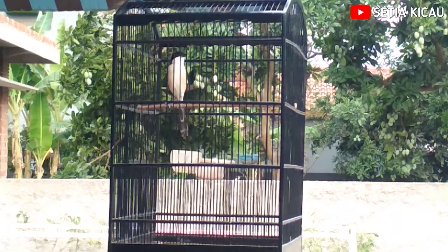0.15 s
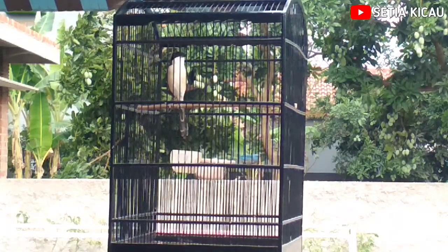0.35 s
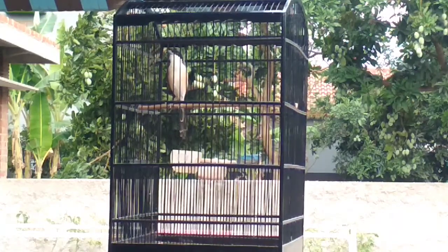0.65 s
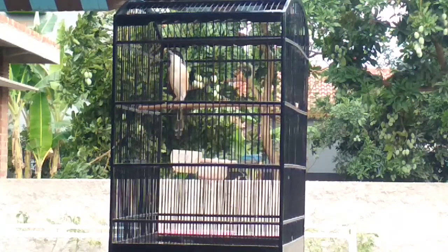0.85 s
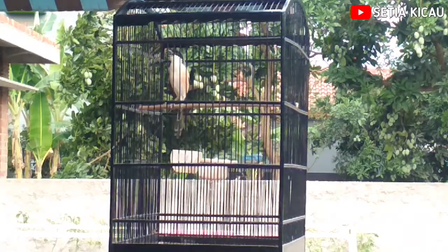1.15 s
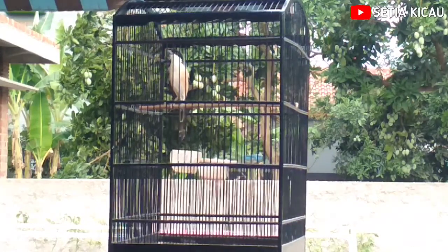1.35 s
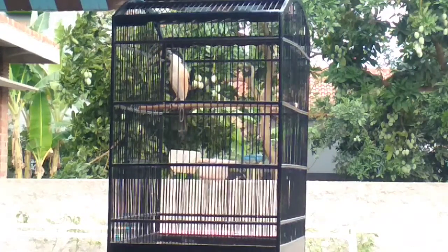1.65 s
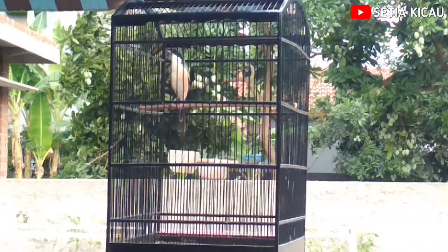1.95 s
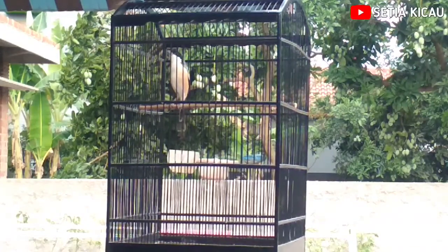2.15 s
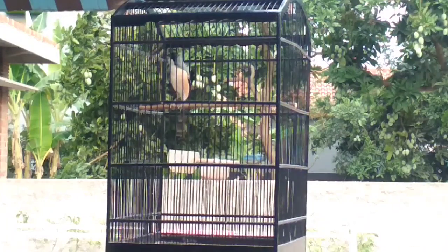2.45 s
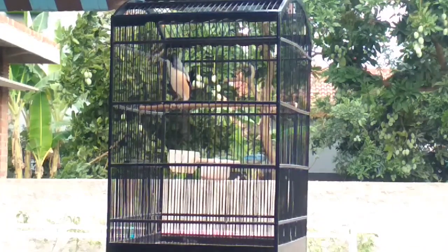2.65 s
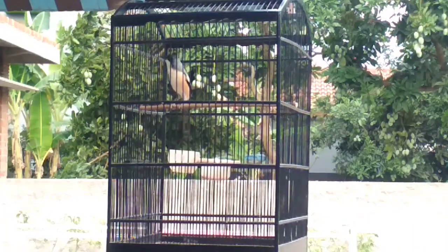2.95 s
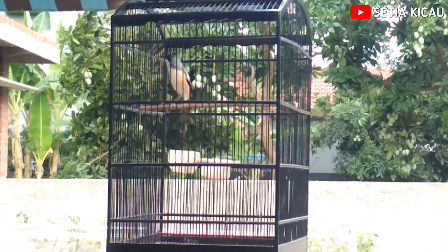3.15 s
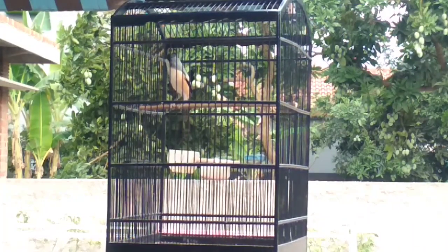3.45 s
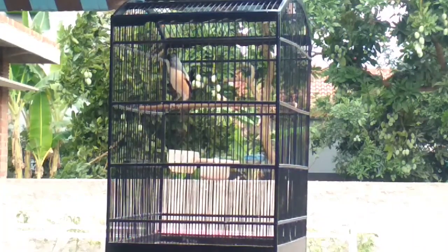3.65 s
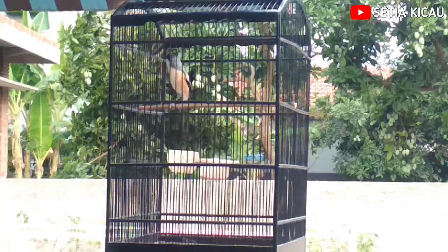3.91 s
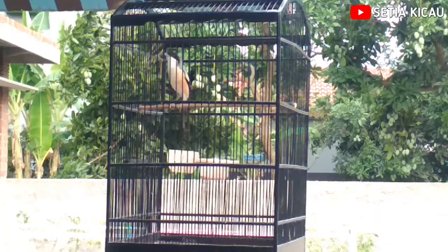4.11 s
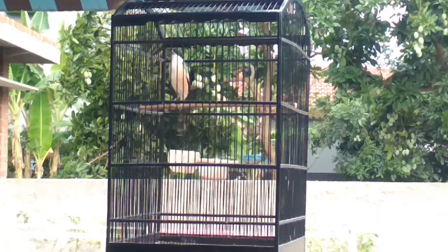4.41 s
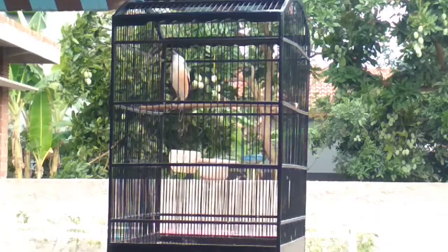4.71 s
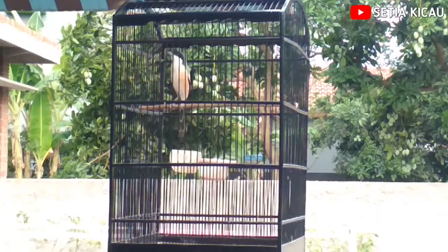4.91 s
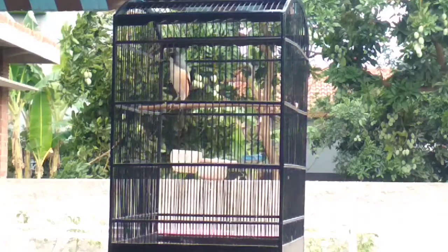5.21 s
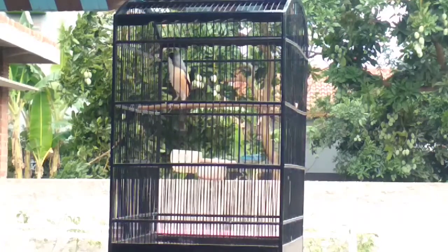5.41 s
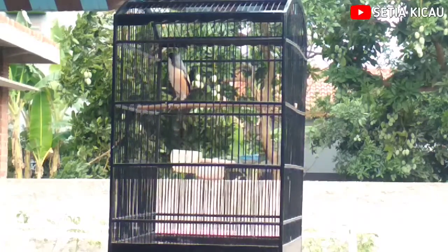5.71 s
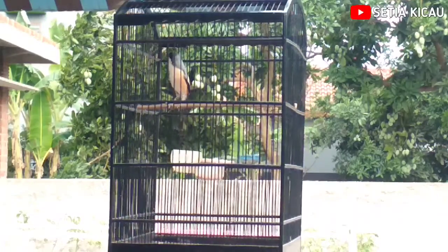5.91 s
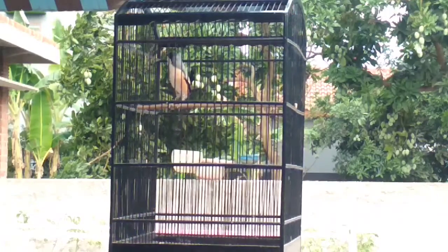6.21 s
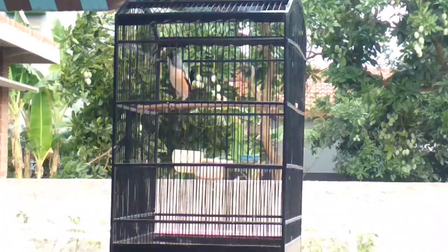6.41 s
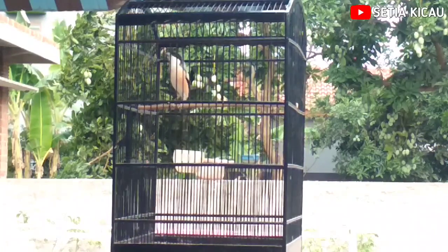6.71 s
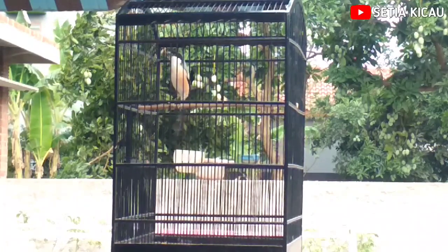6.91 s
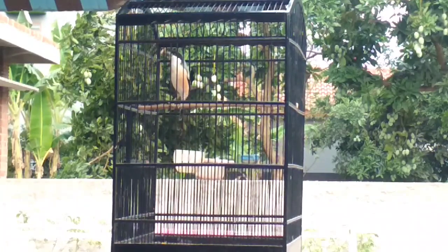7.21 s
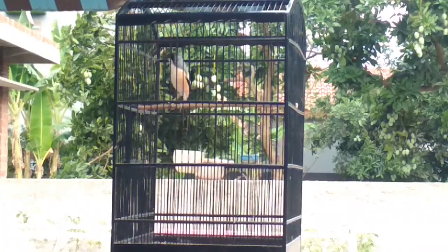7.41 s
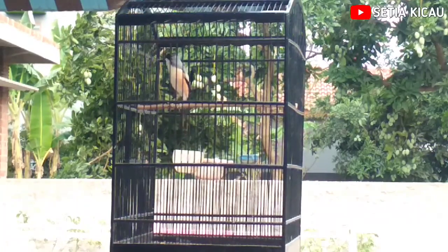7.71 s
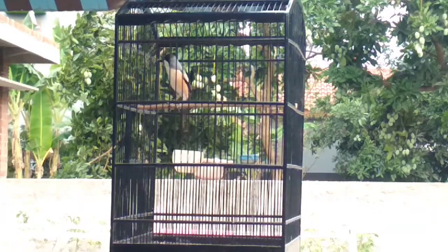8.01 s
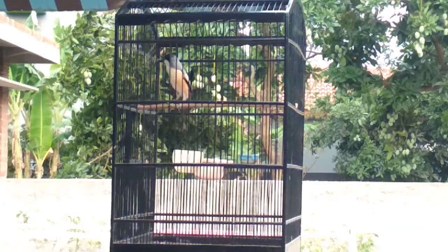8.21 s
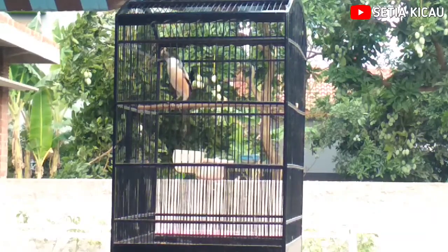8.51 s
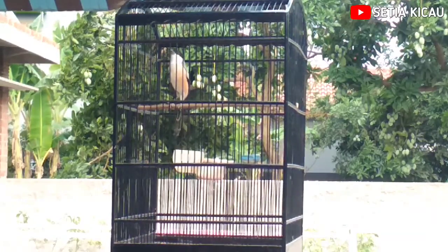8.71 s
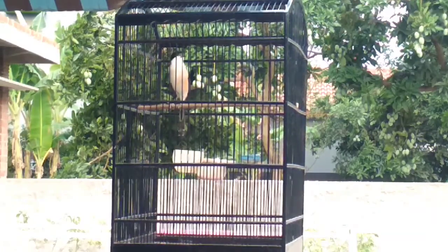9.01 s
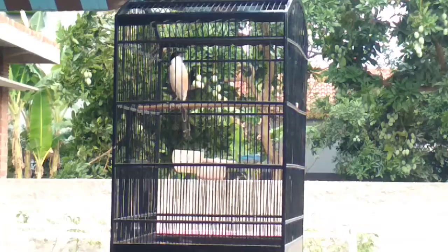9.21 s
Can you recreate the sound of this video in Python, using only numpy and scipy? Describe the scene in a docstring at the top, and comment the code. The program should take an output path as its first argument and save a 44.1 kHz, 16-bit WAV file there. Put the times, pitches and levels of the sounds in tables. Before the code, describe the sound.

Close, bright bird chatter mixes dry rasps, chips, high whistles and sinking squeals over a faint low traffic rumble and distant throbbing coos.

```python
"""Caged shrike under a porch roof

A caged shrike sings in a quiet garden: low chuks, harsh chaks and buzzes, thin whistles, falling squeals.
Its voice box (syrinx) swings between a clean tone and a rasp made of uneven pulses.
The porch and garden walls answer every note with single reflections and fading echoes.
A dove's coos are low throbbing tones some way off. Steady distant traffic is low shaped noise,
and brief deep gusts of wind on the microphones are deeper noise."""
import sys
import numpy as np
from scipy import signal
from scipy.fft import rfft, irfft, next_fast_len
from scipy.io import wavfile
from scipy.ndimage import map_coordinates

SR = 44100
rng = np.random.default_rng(int(sys.argv[2]) if len(sys.argv) > 2 else 0)


def output_pcm(signal):
    """Save a mono or channel-first signal as 16-bit PCM at the path in sys.argv[1].

    Samples are clipped to [-1, 1] before scaling.
    """
    pcm = np.clip(np.atleast_2d(signal).T, -1, 1) * 32767
    wavfile.write(sys.argv[1], SR, np.round(pcm).astype(np.int16))


N = 412335
TOP_HZ = 15750  # nothing above this is kept

# Levels in the tables are relative: the mixing functions set the final balance.

# Tone colour of the traffic, and of the wind before its treble is cut:
# (frequency [Hz], level per Hz [dB])
LOW_SPECTRUM = [(12, -27.5), (20, -7), (64, 3), (86, -3.5), (130, -1.5), (172, -18.5), (253, -20),
                (300, -30), (390, -44), (660, -120)]
# Steady distant traffic: (time [s], level [dB])
TRAFFIC_LEVEL = [(0, -64.5), (5, -65), (6.6, -66), (7.3, -72.5), (7.8, -66.5), (8.4, -73), (9.35, -63.5)]
# Gusts of wind on the microphones:
# (time of top [s], time from top to 1/e of its height [s], level [dB])
GUSTS = [(.6, 0.12, -58.5), (2.33, 0.068, -54), (3.439, 0.078, -59.5), (3.88, 0.025, -60.5),
         (4.34, 0.082, -52), (4.561, 0.052, -50.5), (5.08, 0.056, -56.5), (5.64, 0.026, -54.5),
         (6.1, 0.092, -56), (6.521, 0.11, -59.5), (6.77, 0.069, -61.5), (8.7, 0.055, -61.5),
         (9.199, 0.092, -62)]
# Low hush of the neighbourhood: (time [s], level [dB])
HUSH_LEVEL = [(0, -77), (.9, -79), (2.6, -77), (4.1, -81.5), (8.7, -87.5), (9.35, -68.5)]
# Tone colour of that hush: (frequency [Hz], level per Hz [dB])
HUSH_SPECTRUM = [(150, -28.5), (250, -1.0), (380, 1.5), (600, -5.5), (1100, -10.5), (2500, -26.5),
                 (6000, -67)]
# Tone colour of the faint air noise: (frequency [Hz], level per Hz [dB])
AIR_SPECTRUM = [(60, -3), (160, 2), (300, -4), (500, -13), (1000, -13.5), (2000, -19), (5000, -35.5),
                (9000, -26.5), (12000, -25.5), (14000, -38), (16000, -42)]

# Resonances of throat and open beak: (frequency [Hz], gain [dB])
BEAK = [(2500, -23.5), (4500, -5.5), (6000, -7), (8000, -3), (9300, -8), (10600, -0.5), (12000, 2.5),
        (13300, -3), (15500, -5)]
# Tone colour of the singer's breath: (frequency [Hz], gain [dB])
BREATH_SPECTRUM = [(4000, -6), (6500, 3.5), (9500, -16), (12000, -8), (15000, 1)]

# Soft slurs that rise or bend; the first is the faint high end of an earlier note:
# (time [s], length [s], start pitch [Hz], middle pitch [Hz], end pitch [Hz], level [dB], rasp [0-1])
SLURS = [(0, 0.054, 5480, 5590, 5650, -61.5, 0.64), (1.644, 0.082, 1703, 2090, 2168, -48, 0.9),
         (1.764, 0.037, 994, 1324, 1310, -55, 0), (1.967, 0.12, 2150, 2222, 1456, -55, 0.46)]

# Short dove coos: (time [s], length [s], pitch [Hz], level [dB])
COOS = [(0.097, 0.12, 645, -66), (1.08, .04, 763, -70), (1.253, 0.045, 626, -65),
        (1.585, 0.029, 618, -63.5), (2.464, 0.05, 620, -68), (2.766, 0.052, 603, -68),
        (2.917, 0.051, 613, -62.5), (3.121, 0.086, 750, -64.5), (3.369, .15, 652, -66.5),
        (3.573, 0.036, 631, -60.5), (6.221, 0.055, 629, -67), (6.395, 0.12, 641, -61)]
# Long rolled coos, all sinking alike: (time [s], length [s], level [dB])
ROLLS = [(.43, 0.39, -68.5), (3.704, 0.35, -69), (6.721, .43, -65.5)]
ROLL_START_HZ, ROLL_END_HZ = 742, 614
# A closing run of even coos, each a little lower
RUN_START_S, RUN_STEP_S, RUN_NOTE_S = 7.262, .1445, 0.045
RUN_HZ, RUN_SAG_HZ, RUN_DB = 632, 11, -63.5

# Soft chuks: (time [s], pitch [Hz], level [dB], overtone level against the main tone [dB])
CHUKS = [(0.256, 2440, -44.5, -8), (.526, 2298, -44, -11.5), (0.638, 2363, -43.5, -17),
         (0.75, 2326, -43.5, -21), (0.868, 2213, -43.5, -18), (1.046, 2112, -45, -20.5)]
# Course of one chuk: (time from its start [s], pitch [ratio], level [dB], rasp [0-1])
CHUK_COURSE = [(0, 1.04, -22.5, .03), (.011, 0.9, -3.5, 0), (.02, 1.2, -3, 0.9), (.03, 1.1, 0, .6),
               (.038, .9, 2.5, .15), (.05, 0.69, -17, .1)]

# Buzzes, creeping upward; glide is end rate over start rate: (time [s], length [s],
# start pulse rate [Hz], glide [ratio], throat [Hz], level [dB], treble level [dB], rasp [0-1])
BUZZES = [(1.288, 0.031, 876, 1.37, 4310, -39.5, -41.5, 0.74),
          (1.755, .034, 1042, 1.35, 2430, -40.5, -56, 0.46),
          (3.09, .064, 663, 1.26, 3400, -43.5, -54, 0.22), (3.256, .22, 681.6, 1.06, 1620, -62, -88, 0.5),
          (4.014, 0.06, 704, 1.21, 3850, -41, -47, .3)]
BUZZ_WIDTH_HZ = 1690
# Chips, short bright upward flicks: (time [s], throat [Hz], level [dB], treble level [dB])
CHIPS = [(2.686, 4270, -35.5, -45.5), (6.205, 4600, -34.5, -37), (7.124, 4520, -36.5, -40.5),
         (7.504, 4410, -36.5, -41.5), (7.851, 4660, -37.5, -46), (8.189, 4680, -36, -45),
         (8.623, 4540, -37.5, -41.5), (9.047, 4180, -37, -40)]
CHIP_S, CHIP_RATE_HZ, CHIP_GLIDE, CHIP_WIDTH_HZ, CHIP_RASP = .03, 1030, 1.27, 920, 0.53
# Chows, low rasps that slide down:
# (time [s], length [s], start pulse rate [Hz], glide [ratio], level [dB], rasp [0-1])
CHOWS = [(2.875, 0.081, 1168, 0.81, -43.5, .35), (4.194, 0.076, 1173, 0.74, -43, .35),
         (4.527, 0.051, 1303, .66, -44.5, 0.8), (5.02, .047, 1353, 0.65, -43, 0.8)]
CHOW_THROAT_HZ, CHOW_WIDTH_HZ, CHOW_TREBLE_DB = 2363, 1480, -18  # treble is against the level

# Thin wandering whistles, one list each:
# (time [s], pitch [Hz], level [dB], overtone level against the main tone [dB], rasp [0-1])
WHISTLES = [
    [(1.317, 5855, -34.5, -2, 0.02), (1.357, 6360, -39.5, 3, .1), (1.382, 5790, -48, 19, 0.4),
     (1.402, 4930, -34.5, -9.5, 0.4), (1.44, 4585, -37.5, -13, 0), (1.458, 4670, -53, -8, 0)],
    [(2.441, 7170, -46, -15, 0.26), (2.46, 6760, -37.5, -17, 0), (2.475, 5450, -44.5, -4, .3),
     (2.52, 4660, -60.5, 7, 0.1), (2.566, 4870, -49.5, 1, 0), (2.578, 5050, -30.5, -36, 0.01),
     (2.592, 5896, -40.5, 4.5, .1), (2.622, 6370, -48, 2, 0)],
    [(3.814, 6920, -46.5, -7, 0.05), (3.838, 4550, -56, 0, 0.1), (3.872, 4305, -56, -3, 0),
     (3.908, 4580, -47.5, -6.5, 0.01), (3.935, 5890, -38, -1.5, 0.1), (3.965, 6120, -43.5, -8, 0.02)],
]

# Chak-chaks, a dry rising chak and a softer one that falls: (time [s], base pulse rate [Hz],
# base throat [Hz], first stroke level [dB], second stroke level [dB], base treble level [dB])
CHAKS = [(2.197, 818, 3090, -37, -43, -48.5), (3.545, 843.4, 3420, -40.5, -47.5, -54)]
# Their two strokes: (time from start [s], length [s], pulse rate [ratio], glide [ratio],
# throat [ratio], throat width [Hz], treble change [dB])
CHAK_STROKES = [(0, .024, 1, 1.15, 0.99, 1750, 0.5), (0.087, .028, 1.15, .72, 0.83, 2200, -4.5)]
# Screeches, a rasp that rises and falls back: (time [s], base pulse rate [Hz],
# base throat [Hz], first stroke level [dB], second stroke level [dB], base treble level [dB])
SCREECHES = [(5.536, 1156, 4780, -44.5, -42.5, -44), (5.912, 1204, 4930, -41.5, -38.5, -39.5),
             (6.458, 1679, 5370, -40, -36, -39.5), (6.793, 1305, 5080, -34.5, -40.5, -34.5)]
# Their two strokes: (time from start [s], length [s], pulse rate [ratio], glide [ratio],
# throat [ratio], throat width [Hz], treble change [dB])
SCREECH_STROKES = [(0, .036, 1, 1.13, 0.95, 1650, 1), (0.04, .031, 1.09, .89, 0.92, 1500, 2.5)]
CHAK_RASP, SCREECH_RASP = .55, .45

# Other far calls:
# (time [s], length [s], start pitch [Hz], end pitch [Hz], level [dB], roll [0-1])
FAR_CALLS = [(4.44, 0.092, 1700, 1720, -72, 0.27), (5.13, 0.2, 1046, 890, -72.5, 0.5),
             (8.81, .054, 491, 466, -75.5, .2), (9.08, 0.071, 459, 530, -65, 0.61),
             (9.175, .11, 1040, 928, -71, 0.23), (9.275, 0.047, 479, 514, -62.5, 0.2)]

# Upslurs, a buzzy tone that creeps up to a knee and flicks higher:
# (time [s], length [s], start pitch [Hz], knee pitch [Hz], top pitch [Hz], level [dB])
UPSLURS = [(5.43, .06, 2940, 3174, 4060, -43.5), (5.741, .128, 3028, 3252, 4785, -42),
           (6.336, .082, 2844, 3863, 4990, -43), (6.602, .15, 3593, 3990, 4800, -42.5)]
KNEE_SHARE, UPSLUR_SWELL_DB = 0.76, -9  # place of the knee in the note; level change at the start

# Squeals, a rasp that clears into a falling, fading tone:
# (time [s], length [s], start pitch [Hz], end pitch [Hz], level [dB])
SQUEALS = [(8.337, .14, 4425, 3097, -38), (8.717, .235, 4240, 3053, -35.5),
           (9.141, .195, 4270, 2967, -35.5)]
SQUEAL_FADE_DB = -17.5  # level change over the note
SQUEAL_CLEAR_S, SQUEAL_LEAD_S = 0.02, 0.025  # time to clear; head start of the rasp
SQUEAL_BOW, SQUEAL_RIPPLE = .02, .008  # shares of the pitch: held up in mid-note; random ripple

# Left-right balance of the direct song: (frequency [Hz], left minus right [dB])
BEAK_PAN = [(1000, 7), (4500, 0.5), (8000, -1.5), (11000, -8.5), (15000, -6)]
# Single reflections: (delay [s], left level [dB], right level [dB])
WALLS = [(.0013, -11, -19), (.0034, -10, -8.5), (0.011, -1, -8.5), (0.018, -12, -17), (.03, -17, -13.5)]
# How slowly the porch and garden echoes die: (frequency [Hz], time to fall by 60 dB [s])
ECHO_DECAY = [(500, 0.5), (2000, 0.36), (5000, 0.32), (9000, 0.39), (15000, 0.28)]
# Tone colour of the garden echoes of the song: (frequency [Hz], gain [dB])
GARDEN_TONE = [(2000, 4), (5000, 3.5), (12000, -0.5), (15000, 2.0)]


def amp(db):
    """Turns decibels into gain."""
    return 10 ** (np.asarray(db) / 20)


def unit(x):
    """Scales x to an average (rms) strength of 1."""
    return x / np.sqrt(np.mean(x ** 2) + 1e-20)


def along(points, hz):
    """Reads a (frequency, value) table on a log frequency axis."""
    f, v = np.transpose(points)
    return np.interp(np.log(hz + 1), np.log(f + 1), v)


def clock(length):
    """Gives the sample times of one note."""
    return np.arange(int(length * SR)) / SR


def wobble(rate, size):
    """Draws a smooth random curve with rate random knots a second."""
    knots = rng.standard_normal(int(size * rate / SR) + 4)
    return map_coordinates(knots, [np.arange(size) * rate / SR], mode="mirror")


def filtered(x, response):
    """Multiplies the spectrum of x by a response that depends on frequency."""
    n = x.shape[-1]
    m = next_fast_len(n + 4096)
    return irfft(rfft(x, m) * response(np.fft.rfftfreq(m, 1 / SR)), m)[..., :n]


def high_pass(f, edge_hz, order=8):
    """Gain of a steep bass cut; with f and the edge swapped it cuts treble."""
    return 1 / np.sqrt(1 + (edge_hz / (f + 1)) ** (2 * order))


def gate(t, length, rise, fall):
    """Opens smoothly at 0 and closes around the given length."""
    opening = np.clip(t / rise, 0, 1)
    closing = np.clip((length - t) / fall + .5, 0, 1)
    return np.sin(np.pi / 2 * opening * closing) ** 2


def add(track, s, x):
    """Mixes x into the track at s seconds."""
    part = track[max(round(s * SR), 0):][:len(x)]
    part += x[:len(part)]


def noise(spectrum, width):
    """Stereo noise of rms 1; width is its side to mid ratio."""
    mid, side = filtered(rng.standard_normal((2, N)), lambda f: amp(along(spectrum, f)))
    return unit(np.array([mid + width * side, mid - width * side]))


def traffic(trim_db=-1, unrest_db=2.0):
    """Steady distant traffic: low noise whose level wavers a little."""
    t = np.arange(N) / SR
    level_db = np.interp(t, *np.transpose(TRAFFIC_LEVEL)) + trim_db + unrest_db * wobble(5, N)
    return amp(level_db) * noise(LOW_SPECTRUM, width=0.13)


def wind(trim_db=-1, edge_hz=110):
    """Brief deep gusts of wind on the microphones: low noise that swells and dies."""
    t = np.arange(N) / SR
    gusts = sum(amp(db + trim_db) * np.exp(-((t - s) / width) ** 2) for s, width, db in GUSTS)
    broad = noise(LOW_SPECTRUM, width=0.51)
    return gusts * unit(filtered(broad, lambda f: high_pass(edge_hz, f, order=2)))


def background(air_db=-76, left_db=2, drone_hz=59.0, drone_db=-73, hush_db=-1):
    """Traffic, wind and a wavering drone, all raised on the left, with a faint hush and air noise."""
    t = np.arange(N) / SR
    drone_phase = 2 * np.pi * np.cumsum(drone_hz + 2.7 * wobble(6, N)) / SR
    drone = amp(drone_db + 3.3 * wobble(3, N)) * np.sin(drone_phase)
    hush_level_db = np.interp(t, *np.transpose(HUSH_LEVEL)) + hush_db + 2 * wobble(12, N)
    hush = amp(hush_level_db) * noise(HUSH_SPECTRUM, width=0.57)
    air = amp(air_db + 2.7 * wobble(1.19, N)) * noise(AIR_SPECTRUM, width=0.47)
    return (traffic() + wind() + drone) * amp([[left_db], [-left_db]]) + hush + air


def tone(t, pitch, level_db, overtone_db, rasp, flutter=0.13, flutter_rate=1500, shimmer=0.09,
         waver=0.0042, overtone_slope=1.24):
    """One vibrating membrane: rasp shakes its pitch and size, the beak colours its overtones."""
    n = len(t)
    shaken = 1 + waver * wobble(220, n) + flutter * rasp * wobble(flutter_rate, n)
    phase = 2 * np.pi * np.cumsum(pitch * shaken) / SR
    k = np.arange(2, 7)[:, None]  # overtone numbers
    below_top = 1 - high_pass(k * pitch, 18000, order=12)
    weights = amp(along(BEAK, k * pitch)) * below_top / k ** overtone_slope
    overtones = (weights * np.sin(k * phase)).sum(0) / np.sqrt((weights ** 2).sum(0) + 1e-12)
    size = amp(level_db + 1.6 * wobble(130, n)) * (1 + shimmer * rasp * wobble(flutter_rate, n))
    edge = 0.0026  # seconds to open or close
    wave = np.sin(phase) + amp(overtone_db) * overtones
    return np.sqrt(2) * size * gate(t, t[-1] - edge / 2, edge, edge) * wave


def sung(t, pitch, level_db, overtone_db, rasp, breath_db=-11):
    """A gliding tone; the raspier it is, up to a limit, the more air hisses with it."""
    air = filtered(rng.standard_normal(len(t)),
                   lambda f: high_pass(f, 2300) * amp(along(BREATH_SPECTRUM, f)))
    leak = np.clip(4 * rasp - .13, 0, 1)
    breath = amp(level_db + breath_db) * leak * gate(t, t[-1] - .005, 0.0089, 0.012)
    return tone(t, pitch, level_db, overtone_db, rasp) + breath * unit(air)


def slurs(edge_db=-9, overtone_db=-26):
    """Soft notes that rise or bend, with weak overtones, loudest in the middle."""
    out = np.zeros(N)
    for s, length, start_hz, middle_hz, end_hz, db, rasp in SLURS:
        t = clock(length)
        pitch = np.interp(t / length, [0, .5, 1], [start_hz, middle_hz, end_hz])
        level_db = db + edge_db * (2 * t / length - 1) ** 2
        add(out, s, sung(t, pitch, level_db, overtone_db, rasp, breath_db=-21))
    return out


def coos(notes, roll_rate=26, roll_depth=0.078):
    """Husky notes; roll makes them throb in pitch and level."""
    husk = .4
    out = np.zeros(N)
    for s, length, start_hz, end_hz, db, roll in notes:
        t = clock(length + .03)
        throb_rate = roll_rate * (1 + 0.14 * wobble(25, len(t)))
        throb = roll * np.sin(2 * np.pi * np.cumsum(throb_rate) / SR)
        glide = np.interp(t, [0, length], [start_hz, end_hz])
        pitch = glide * (1 + roll_depth * throb + 0.0054 * wobble(90, len(t)))
        size = 1 + throb + (husk + roll / 2) * wobble(280, len(t))
        envelope = amp(db) * gate(t, length, 0.0066, 0.0068) * unit(size)
        add(out, s, envelope * np.sin(2 * np.pi * np.cumsum(pitch) / SR))
    return out


def dove(count=5, short_roll=0.27, long_roll=0.46):
    """Level-pitched short coos, sinking rolled ones and a closing run, all throbbing tones."""
    notes = [(s, length, hz, hz, db, short_roll) for s, length, hz, db in COOS]
    notes += [(s, length, ROLL_START_HZ, ROLL_END_HZ, db, long_roll) for s, length, db in ROLLS]
    for k in range(count):
        hz = RUN_HZ - k * RUN_SAG_HZ
        notes.append((RUN_START_S + k * RUN_STEP_S, RUN_NOTE_S, hz, hz, RUN_DB, short_roll))
    return coos(notes)


def chuks():
    """A tone flicks up, breaks into rasp and drops."""
    out = np.zeros(N)
    knots, *cols = np.transpose(CHUK_COURSE)
    t = clock(knots[-1])
    ratio, shape_db, rasp = [np.interp(t, knots, c) for c in cols]
    for s, hz, db, overtone_db in CHUKS:
        add(out, s, tone(t, hz * ratio, db + shape_db, overtone_db, rasp,
                         flutter=0.28, flutter_rate=2300, shimmer=0.77))
    return filtered(out, lambda f: high_pass(f, 1896, order=12))


def harsh_note(length, start_hz, glide, throat_hz, width_hz, db, beak_db, rasp, chest_db=-40,
               follow=0.54, rise=0.019, fall=0.01, lead=0.00508, beak_edge_hz=6900):
    """Uneven pulses ring the beak and a throat resonance that glides with their rate."""
    jitter, breathy = .1, .15
    t = clock(length + lead + fall)
    progress = np.clip((t - lead) / length, 0, 1)
    scoop = 1 - .5 * rasp * np.exp(-t / .007)  # harsh notes swoop up into their pitch
    end_hz = start_hz * glide
    mean_hz = (start_hz + end_hz) / 2
    rate = (start_hz + (end_hz - start_hz) * progress) * scoop
    phase = 2 * np.pi * np.cumsum(rate * (1 + jitter * rasp * wobble(450, len(t)))) / SR
    harmonics = np.arange(1, int(TOP_HZ / rate.max()))[:, None]
    pulses = unit(np.cos(harmonics * phase).sum(0))
    puffs = unit(rng.standard_normal(len(t)) * (1 + np.cos(phase)) ** 2)  # turbulence at each opening
    share = np.clip(breathy * rasp, 0, 1)
    source = np.sqrt(1 - share) * pulses + np.sqrt(share) * puffs

    body = np.zeros(len(t))
    for place in (0, .5, 1):  # crossfade the throat at the start, middle and end
        hz = throat_hz * (1 + (end_hz - start_hz) * (place - .5) / mean_hz) ** follow
        ring = filtered(source, lambda f: 1j * f * width_hz * .7
                        / (hz * hz - f * f + 1j * f * width_hz * 0.91))
        body += np.clip(1 - 2 * abs(progress - place), 0, 1) * ring

    low_hz = min(2.94 * mean_hz, 300 + .5 * throat_hz)  # a tighter throat radiates less bass
    high_hz = 5150 + 0.5 * width_hz  # the body's treble is cut here; the treble layer plays above

    def throat_band(f):
        chest_leak = amp(chest_db) * high_pass(f, 1000)
        bass = np.maximum(high_pass(f, low_hz, order=13), chest_leak)
        return bass * (.04 + high_pass(high_hz, f, order=18))

    body = unit(filtered(body, throat_band))
    # soft tissue damps the upper side of the resonance
    body = unit(filtered(body, lambda f: high_pass(1.4 * throat_hz, f, order=3)))
    # a narrow throat pulls the membrane into its nearest harmonic, which glides with the pulse rate
    locked = np.clip((1900 - width_hz) / 1300, 0, .75)
    chirp = np.sin(round(throat_hz / mean_hz) * phase) * (1 + rasp * wobble(600, len(t)))
    body = np.sqrt(1 - locked) * body + np.sqrt(locked) * unit(chirp)
    treble_edge_hz = beak_edge_hz - 0.28 * width_hz
    treble = unit(filtered(source, lambda f: amp(along(BEAK, f)) * high_pass(f, treble_edge_hz)))
    return gate(t, length + lead, rise, fall) * (amp(db) * body + amp(beak_db) * treble)


def single_rasps():
    """Buzzes, chips and chows: one harsh stroke of ringing pulses each."""
    out = np.zeros(N)
    for s, length, rate_hz, glide, throat_hz, db, treble_db, rasp in BUZZES:
        add(out, s, harsh_note(length, rate_hz, glide, throat_hz, BUZZ_WIDTH_HZ, db, treble_db,
                               rasp, chest_db=-9))
    for s, throat_hz, db, treble_db in CHIPS:
        add(out, s, harsh_note(CHIP_S, CHIP_RATE_HZ, CHIP_GLIDE, throat_hz, CHIP_WIDTH_HZ, db,
                               treble_db, CHIP_RASP))
    for s, length, rate_hz, glide, db, rasp in CHOWS:
        add(out, s, harsh_note(length, rate_hz, glide, CHOW_THROAT_HZ, CHOW_WIDTH_HZ, db,
                               db + CHOW_TREBLE_DB, rasp, chest_db=-11.5, follow=0.68))
    return out


def whistles():
    """High tones that wander up and down, with overtones and rasp that come and go."""
    out = np.zeros(N)
    for rows in WHISTLES:
        s, *cols = np.transpose(rows)
        t = clock(s[-1] - s[0])
        pitch, level_db, overtone_db, rasp = [np.interp(t + s[0], s, c) for c in cols]
        add(out, s[0], sung(t, pitch, level_db, overtone_db, rasp))
    return out


def double_rasps(notes, strokes, rasp, chest_db):
    """Chaks and screeches: two harsh strokes, the first rising and the second falling."""
    out = np.zeros(N)
    for s, rate_hz, throat_hz, *levels_db, treble_db in notes:
        for db, stroke in zip(levels_db, strokes):
            delay, length, faster, glide, higher, width_hz, brighter_db = stroke
            add(out, s + delay, harsh_note(length, rate_hz * faster, glide, throat_hz * higher,
                                           width_hz, db, treble_db + brighter_db, rasp, chest_db))
    return out


def upslurs(overtone_db=-5, end_db=-1, creep_rasp=0.078, edge_rasp=0.33):
    """A swelling tone, rough at both ends; the other side of the syrinx buzzes under it."""
    out = np.zeros(N)
    for s, length, start_hz, knee_hz, top_hz, db in UPSLURS:
        t = clock(length)
        pitch = np.interp(t / length, [0, KNEE_SHARE, 1], [start_hz, knee_hz, top_hz])
        stages = [0, KNEE_SHARE / 2, KNEE_SHARE, 1]
        level_db = db + np.interp(t / length, stages, [UPSLUR_SWELL_DB, 0, 0, end_db])
        rasp = np.interp(t / length, stages, [edge_rasp, creep_rasp, creep_rasp, edge_rasp])
        add(out, s, sung(t, pitch, level_db, overtone_db, rasp))
        add(out, s - .006, harsh_note(length=length, start_hz=939, glide=1.2, throat_hz=knee_hz * 1.21,
                                      width_hz=1100, db=db - 11, beak_db=db - 17, rasp=.5))
    return out


def squeals(first_overtone_db=-13, overtone_db=-1, first_rasp=.35, rasp=0.1):
    """A harsh onset clears into a tone that sinks and fades as the air runs out."""
    out = np.zeros(N)
    for s, length, start_hz, end_hz, db in SQUEALS:
        add(out, s - SQUEAL_LEAD_S, harsh_note(length=.033, start_hz=862, glide=1.4, throat_hz=4310,
                                               width_hz=1000, db=db - 1.5, beak_db=db - 3.5, rasp=.55))
        t = clock(length)
        clear = [0, SQUEAL_CLEAR_S]
        bend = 1 + SQUEAL_BOW * np.sin(np.pi * t / length) + SQUEAL_RIPPLE * wobble(70, len(t))
        pitch = bend * (start_hz + (end_hz - start_hz) * t / length)
        level_db = db + SQUEAL_FADE_DB * t / length
        overtones_db = np.interp(t, clear, [first_overtone_db, overtone_db])
        add(out, s, sung(t, pitch, level_db, overtones_db, np.interp(t, clear, [first_rasp, rasp])))
    return out


def song():
    """Everything that the shrike sings."""
    tones = slurs() + chuks() + whistles() + upslurs() + squeals()
    chaks = double_rasps(CHAKS, CHAK_STROKES, CHAK_RASP, chest_db=-5.5)
    screeches = double_rasps(SCREECHES, SCREECH_STROKES, SCREECH_RASP, chest_db=-38.5)
    return tones + single_rasps() + chaks + screeches


def echoes(x, t60_of, delay):
    """Many blurred reflections: dying noise of energy 1 per microphone, fading in around the delay."""
    hz, t, z = signal.stft(rng.standard_normal((2, int(SR * .7))), SR, nperseg=256)
    tail = signal.istft(z * amp(-60 * t / t60_of(hz)[:, None]), SR, nperseg=256)[1]
    tail *= np.clip(np.arange(tail.shape[1]) / SR / delay - .5, 0, 1)
    tail /= np.linalg.norm(tail, axis=1, keepdims=True)
    return signal.fftconvolve(x, tail, axes=1)[:, :N]


def shrike(direct_db=-2, near_db=-10, garden_db=-8, lag_s=.00004):
    """The song arrives straight, off the cage and roof, and off the garden walls."""
    voice = song()
    sides = np.array([[.5], [-.5]])  # left, right

    def to_microphones(f):
        return amp(sides * along(BEAK_PAN, f)) * np.exp(-2j * np.pi * f * sides * lag_s)

    def reflections(f):
        total = 0
        for delay, left_db, right_db in WALLS:
            arrival = delay + sides * rng.normal(0, 0.00013)
            total = total + amp([[left_db], [right_db]]) * np.exp(-2j * np.pi * f * arrival)
        return total

    direct = filtered(voice, to_microphones)
    walls = filtered(direct, reflections)
    near = echoes(direct, lambda f: np.full(len(f), .12), delay=0.00067)
    garden = echoes(voice[None], lambda f: along(ECHO_DECAY, f), delay=0.016)
    garden = filtered(garden, lambda f: amp(along(GARDEN_TONE, f)))
    return amp(direct_db) * (direct + walls) + amp(near_db) * near + amp(garden_db) * garden


def far_birds(direct_db=0, garden_db=-3):
    """The dove and other far callers, heard straight and through blurred reflections."""
    calls = (dove() + coos(FAR_CALLS))[None]
    garden = echoes(calls, lambda f: along(ECHO_DECAY, f), delay=0.0013)
    return amp(direct_db) * calls + amp(garden_db) * garden


def scene():
    """Everything that reaches the two microphones."""
    return background() + shrike() + far_birds()


def record(dry):
    """The recorder keeps nothing above its band limit."""
    return filtered(dry, lambda f: f < TOP_HZ)


dry = scene()
out = record(dry)
output_pcm(out)
```